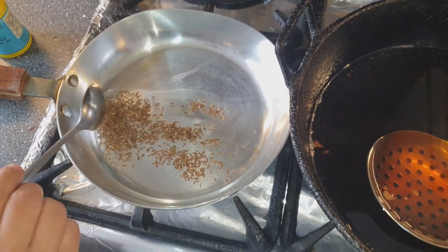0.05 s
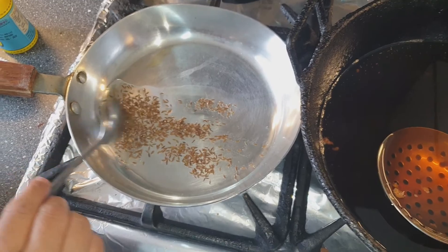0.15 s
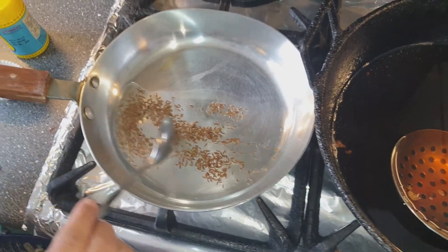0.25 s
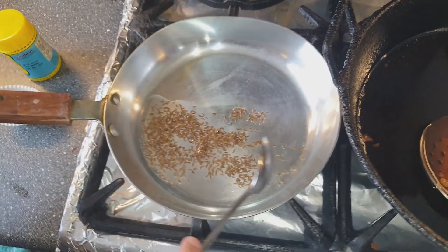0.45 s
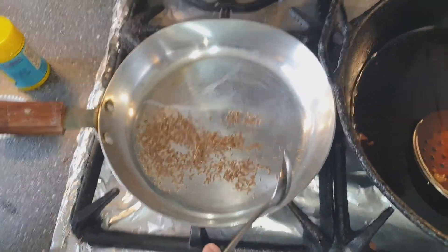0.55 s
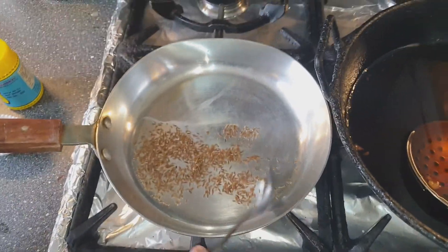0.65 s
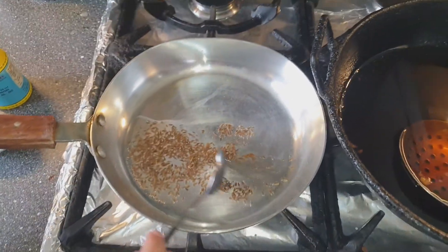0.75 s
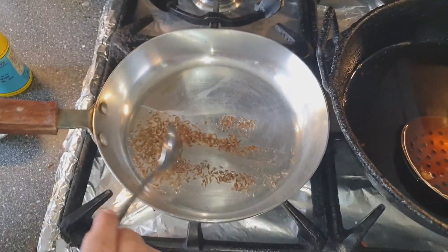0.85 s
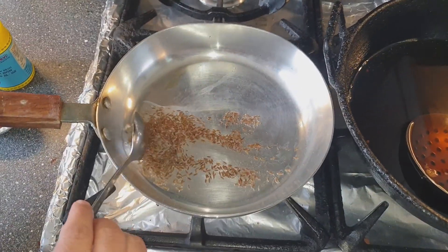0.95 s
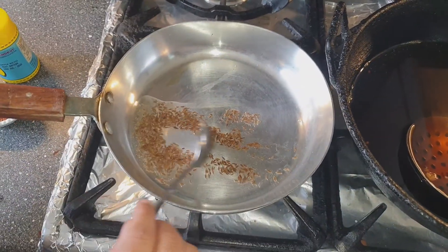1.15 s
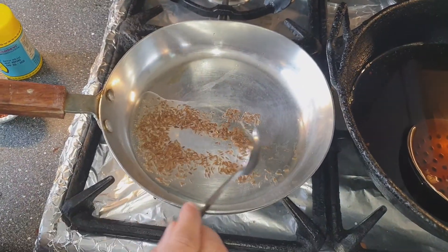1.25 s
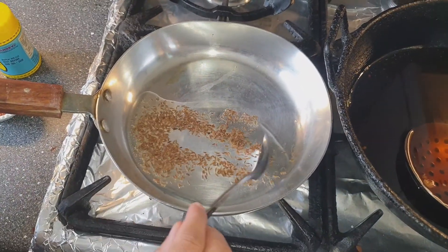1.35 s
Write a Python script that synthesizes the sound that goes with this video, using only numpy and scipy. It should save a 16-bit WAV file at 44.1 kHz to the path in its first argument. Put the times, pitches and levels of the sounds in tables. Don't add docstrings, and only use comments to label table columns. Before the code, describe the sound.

Close stereo pickup in a small kitchen: spoon strikes a thin steel pan, bounces and rings, strikes harder and scrapes, then lands softly on the base; tiny seed ticks and a quiet fan hum lie beneath.

```python
import sys
import numpy as np
from scipy import signal
from scipy.io import wavfile
from scipy.ndimage import uniform_filter1d

SR = 44100
rng = np.random.default_rng(int(sys.argv[2]) if len(sys.argv) > 2 else 0)


def amplitude_ratio(level_db):
    exponent = np.asarray(level_db, float) / 20
    return 10 ** exponent


def put_to_file(sound):
    columns = np.atleast_2d(sound).T
    safe = np.clip(columns, -1, 1)
    whole_steps = np.round(safe * 32767)
    wavfile.write(sys.argv[1], SR, whole_steps.astype(np.int16))


N = 61739

# f/Hz, density/dB
HISS = [(47, 0), (80, -14.5), (160, -16), (348, -15.5), (693, -30.5), (758, -28.5), (7020, -37),
        (15000, -32), (16400, -95)]
HISS_DB = -53.5
# f/Hz, width/Hz, gain/dB
HISS_DIP = (3130, 620, -4.5)
HISS_BUMPS = [(6800, 1010, 8.6), (4760, 820, 5.1), (1790, 144, 7.6)]
# f/Hz, likeness/1
HISS_LIKENESS = [(60, 0.62), (240, 1), (950, -0.17), (3770, -0.37), (15000, 0.65)]
# f/Hz, balance/dB
HISS_PAN = [(60, 1), (240, -3), (950, 2.0), (3770, 1.0), (15000, 4)]

# t/s, f/Hz, level/dB
FAN_TONE = [(0, 48.66, -40.5), (.5, 48.75, -41), (.75, 48.28, -40.5), (1.049, 48.6, -41), (1.4, 49, -40)]
FAN_PAN_DB, FAN_LEAD_RAD = -3, 0.49
# f/Hz, level/dB, width/Hz
FAN_DRONES = [(69, -58, 6), (108, -60, 16), (343, -64, 19), (635, -67.5, 44)]
# t/s, gain/dB
DRONE_SWELL = [(0, 0), (.6, -2.5), (.9, 1), (1.4, -2)]

# f/Hz, t60/s
ROOM_T60 = [(300, 0.43), (2000, 0.31), (8000, 0.34), (15000, 0.34)]
ROOM_DB = -9.5

# t/s, level/dB, length/s, centre f/Hz, balance/dB
SEED_TICKS = [
    (0.064, -47, 0.0017, 12100, 5),
    (0.339, -51, .003, 11000, -8),
    (0.4764, -42.5, 0.00054, 12700, 12.5),
    (0.479, -53.5, 0.018, 10200, 7),
    (0.499, -45, 0.0042, 8750, 5),
    (0.5655, -47, 0.0045, 9750, 6),
    (0.879, -43, 0.0046, 4160, 1),
]

# t/s, level/dB, f/Hz, t60/s, balance/dB
CATCHES = [(.213, -40, 4200, 0.053, 14), (.221, -29, 2780, 0.23, -1), (.224, -28.5, 2355, .15, -6),
           (.225, -33, 2400, 0.073, -1), (.216, -34, 3110, 0.18, -13), (.244, -42, 1557, 0.18, 24),
           (.288, -54, 2410, 0.076, -5), (.203, -35.5, 677, .1, -4), (.318, -46, 3075, 0.099, 0),
           (.305, -53, 635, 0.27, 10), (.718, -34, 1084, 0.16, 10), (.72, -55, 777, 0.17, -6),
           (.733, -37, 1580, 0.044, -17), (.736, -34.5, 2380, 0.087, 5), (.736, -36.5, 3086, 0.18, -5),
           (.742, -35.5, 1084, 0.17, 0), (.743, -38, 777, 0.32, 6.5), (.744, -36, 1910, 0.054, -18),
           (.751, -35, 2417, 0.093, 3), (.76, -38.5, 1084, 0.14, 7), (.768, -41, 4010, .08, -8),
           (.776, -38.5, 1990, 0.16, 1), (.783, -35.5, 2340, .1, -3), (.786, -38, 876, 0.11, 9),
           (.794, -36, 938, 0.088, -3), (.815, -35.5, 953, 0.091, 2), (.822, -33.5, 815, 0.035, 3),
           (.815, -47.5, 3090, .1, -6), (.818, -52, 2300, 0.072, 0), (.832, -42.5, 2336, .12, 2),
           (.841, -44, 2437, 0.068, 5), (1.048, -38.5, 956, 0.088, 7), (1.046, -32.5, 403.3, 0.14, 1.5),
           (1.048, -43.5, 778, 0.12, 4), (1.039, -33, 2314, 0.074, 5), (1.08, -38, 226, 0.078, 2),
           (1.088, -45, 971, 0.24, 4), (1.09, -53.5, 1995, 0.18, 2), (1.107, -38.5, 230, 0.11, -2),
           (1.158, -61, 1084, 0.33, -5)]
CATCH_CYCLES, CATCH_RISE_S = 1.5, 0.0014

# t/s, level/dB
DRAG_PRESSURE = [
    (0.7, -27.5),
    (.725, -44),
    (.77, -37),
    (0.826, -41),
    (0.849, -48),
    (0.879, -55.5),
    (0.961, -68.5),
]
# f/Hz, width/Hz, level/dB
DRAG_MODES = [(777, 60, -5), (880, 93, -8), (1084, 50, 9), (1906, 100, -6), (2326, 95, 7), (2640, 80, -19),
              (3200, 99, 8), (1630, 200, 9)]
DRAG_SHIFT_S = .785
# f/Hz, density/dB
DRAG_HISS = [(150, -11), (390, -10.5), (560, -24), (900, -10), (2400, -13), (4500, -11), (10000, -20),
             (15500, -25)]
DRAG_HISS_DB, DRAG_FADE_DB_PER_S = 7, 25

# t/s, level/dB, clatter/dB, clatter length factor/1, time until the spoon mutes the ring/s
BLOWS = [
    (-.06, -33.5, -0.5, 0.92, 0.11),
    (0.2019, -19.5, -5.5, 0.9, 0.13),
    (0.6916, -16.5, -9, 1, 0.02),
    (1.0313, -31, -5, 0.96, 0.18),
]
# f/Hz, level/dB, t60/s, balance/dB
EARLIER_MODES = [(1561, 0, .5, -1), (1985, -14, .35, 3), (2794, -11, .55, -6), (1040, -16, .2, 0),
                 (620, -17, .2, 0)]
# f/Hz, level/dB, t60/s, balance/dB
WALL_MODES = [(635, -8, .24, 3), (1084, -5, .31, 10), (1562, -4, .58, -5), (1984, 0, .24, 5),
              (2400, -3, .2, 3), (2780, -7, .28, -5), (1217, -14, .25, -5), (1955, -5, .1, -3),
              (2315, -7, .13, -4), (3075, -15, .29, -1), (3466, -14, .2, 5), (3661, -7, .09, 2),
              (870, -10, .13, -2), (190, -14, .12, 0)]
# f/Hz, level/dB, t60/s, balance/dB
FAR_WALL_MODES = [(1042, -8.5, 0.33, -12), (1553, -1, 0.15, 3), (1947, 2, 0.39, 8.5),
                  (3090, -38, 0.075, 11), (2320, -3.5, 0.061, 8), (3110, -1, 0.087, 1),
                  (393, -6.5, 0.12, 0), (213, -13.5, 0.24, -2), (629, -11, 0.12, 8), (7470, 5, 0.0049, 9.5)]
# f/Hz, level/dB, t60/s, balance/dB
BASE_MODES = [(233.6, -0.5, 0.3, -3), (401.4, -10, 0.33, 1), (637, -16, 0.55, 6), (956, -10, 0.23, 9),
              (1049, -15.5, 0.64, -3), (1203, -6.5, 0.12, 13), (301.7, -2.5, 0.23, 0),
              (1978, -13.5, 0.35, 1), (1738, -6, 0.12, -4), (3486, -6, 0.054, -13.5),
              (4294, -6.5, 0.029, 24), (188.4, -3, 0.29, 3), (344, -7, 0.35, 0)]
# f/Hz, density/dB
CLATTER_COLOURS = [
    [(300, -8), (1500, -11.5), (4000, -18.5), (15500, -39)],
    [(150, -18), (480, -14.5), (750, -4), (2200, -6), (5000, -10), (11500, -19.5), (15500, -28.5)],
    [(150, -12), (600, -9.5), (900, 2), (2200, -9), (5000, -16), (11500, -21.5), (15500, -32)],
    [(150, -5), (330, -0.5), (580, -21), (1000, -5.5), (2500, -15), (6000, -21.5), (15500, -29)],
]
# f/Hz, t60/s
CLATTER_T60 = [(200, 0.15), (1000, 0.35), (3000, 0.36), (8000, 0.14), (15000, 0.44)]
CLATTER_LIKENESS, CLATTER_PAN_DB, RIPPLE_DB = 0.097, 8.5, 7
CRACK_S, CRACK_DB = 0.0083, -4
TREBLE_CRACK_S, TREBLE_CRACK_DB = 0.0096, 2.5
CONTACT_S, CONTACT_CYCLES = .0003, 0.65
HARD_DB = -22
MUTE_S, MUTE_DB, MUTED_DB_PER_S = .025, -19, 96

LAG_S, MODE_SCATTER_RAD, EDGE_HZ = .0001, .2, 15400
SIDE = np.array([[.5], [-.5]])
# from f/Hz, to f/Hz, share emptied/1
LOST_BANDS = [
    (2300, 3900, .09),
    (7500, 15000, .05),
]
LOST_DB, LOUD_DB = -20, 9


def evened(x):
    return x / np.sqrt(np.mean(x ** 2) + 1e-20)


def read(points, hz):
    f, value = np.transpose(points)
    return np.interp(np.log(hz + 1), np.log(f + 1), value)


def add(mix, s, sound):
    at = round(s * SR)
    sound = sound[:, max(-at, 0):]
    part = mix[:, max(at, 0):][:, :sound.shape[1]]
    part += sound[:, :part.shape[1]]


def ports(length, same):
    a, b = rng.standard_normal((2, length))
    right = same * np.roll(a, round(LAG_S * SR)) + np.sqrt(1 - same ** 2) * b
    return np.array([a, right])


def shaped(x, db_at, size=256):
    hz, t, z = signal.stft(x, SR, nperseg=size, noverlap=size * 3 // 4)
    z = z * amplitude_ratio(db_at(hz[:, None], t))
    return signal.istft(z, SR, nperseg=size, noverlap=size * 3 // 4)[1][:, :x.shape[1]]


def resonate(x, hz, width):
    return signal.lfilter(*signal.iirpeak(hz, hz / max(width, 1), SR), x)


def kitchen():
    frames, hz = N // 256 + 5, np.fft.rfftfreq(1024, 1 / SR)
    a, b, c, d, patches = rng.standard_normal((frames, 513, 5)).T
    patches = evened(uniform_filter1d(uniform_filter1d(patches, 12, 0), 14, 1))
    same = np.clip(read(HISS_LIKENESS, hz), -1, 1)[:, None]
    left = a + 1j * b
    right = same * left + np.sqrt(1 - same ** 2) * (c + 1j * d)
    right = right * np.exp(-2j * np.pi * hz * LAG_S)[:, None]
    colour = read(HISS, hz) - 30 * (hz < 60)
    for f, width, gain in [*HISS_BUMPS, HISS_DIP]:
        colour = colour + gain * np.exp(-((hz - f) / width) ** 2)
    balance = SIDE[:, :, None] * read(HISS_PAN, hz)[:, None]
    z = np.array([left, right]) * amplitude_ratio(colour[:, None] + 2.2 * patches + balance)
    return amplitude_ratio(HISS_DB) * evened(signal.istft(z, nperseg=1024, noverlap=768)[1][:, :N])


def fan():
    s, hz, db = np.transpose(FAN_TONE)
    t = np.arange(N) / SR
    turn = 2 * np.pi * np.cumsum(np.interp(t, s, hz)) / SR + 4.55
    level = amplitude_ratio(np.interp(t, s, db) + SIDE * FAN_PAN_DB)
    tone = np.sqrt(2) * level * np.sin(turn + SIDE * FAN_LEAD_RAD)
    drones = np.zeros((2, N))
    for f, drone_db, width in FAN_DRONES:
        fuzz = resonate(resonate(ports(N, 0.94), f, width), f, width)
        drones += amplitude_ratio(drone_db) * evened(fuzz)
    return tone + amplitude_ratio(np.interp(t, *np.transpose(DRONE_SWELL))) * drones


def room(x):
    taps = rng.choice([-1., 1.], (2, SR // 2)) * (rng.random((2, SR // 2)) < .05)
    taps[:, :200] = 0
    tail = shaped(taps, lambda f, s: -60 * s / read(ROOM_T60, f) - 8 * (f < 500))
    return signal.fftconvolve(x, tail / np.linalg.norm(tail[0]), axes=1)[:, :N]


def tick(start, db, length, hz, pan_db):
    t = np.arange(SR // 20) / SR
    puff = evened(resonate(ports(len(t), 0.14), hz, min(hz * 0.84, SR / 3)))
    return start, puff * np.exp(-t / length) * amplitude_ratio(db + SIDE * pan_db)


def catch(start, db, hz, t60, pan_db):
    t = np.arange(SR // 5) / SR
    swell = np.sin(np.pi / 2 * np.minimum(t / (CATCH_RISE_S + CATCH_CYCLES / hz), 1)) ** 2
    level = amplitude_ratio(db + SIDE * pan_db - 60 * t / t60)
    tone = np.sin(2 * np.pi * (hz * (t + SIDE * LAG_S) + rng.random()))
    return start, np.sqrt(2) * swell * level * tone


def scrape():
    s, db = np.transpose(DRAG_PRESSURE)
    t = np.arange(N) / SR
    roughness = evened(uniform_filter1d(rng.standard_normal(N), size=60))
    rub = ports(N, CLATTER_LIKENESS) * amplitude_ratio(1.8 * roughness)
    rub *= amplitude_ratio(np.interp(t, s, db, left=-120, right=-120))
    scale = np.sqrt(np.mean(rub ** 2))
    late = np.clip((t - DRAG_SHIFT_S) / .015 + .5, .1, .9)
    shares = [1 - late, late, 1 - late] + [1] * len(DRAG_MODES)
    tones = np.zeros((2, N))
    for share, (f, width, mode_db) in zip(shares, DRAG_MODES):
        tones += amplitude_ratio(mode_db) * share * resonate(rub, f, width) / np.sqrt(width)

    def hiss_db(f, s):
        fade = DRAG_FADE_DB_PER_S * np.clip(s - DRAG_PRESSURE[0][0], 0, .3)
        return read(DRAG_HISS, f) - fade * (f > 3500)

    hiss = shaped(rub, hiss_db)
    return scale * evened(evened(tones) + amplitude_ratio(DRAG_HISS_DB) * evened(hiss)) * amplitude_ratio(3 * SIDE)


def struck_modes(t, modes, mute):
    hz, mode_db, t60, pan = np.transpose(modes)[:, :, None]
    phase, lead = rng.standard_normal((len(modes), 2)).T[:, :, None]
    onset = np.minimum(hz * t / (CONTACT_CYCLES * (1 + (400 / hz) ** 2)), 1)
    ring = []
    for side in (.5, -.5):
        level = amplitude_ratio(mode_db + side * pan - 60 * t / t60)
        cycles = hz * (t + side * LAG_S) + 0.19 * phase
        wave = np.sin(2 * np.pi * cycles + side * MODE_SCATTER_RAD * lead)
        ring.append((level * onset * wave).sum(0))
    muting = MUTE_DB * np.clip((t - mute) / MUTE_S, 0, 1) - MUTED_DB_PER_S * np.maximum(t - mute, 0)
    return np.array(ring) / np.linalg.norm(amplitude_ratio(mode_db)) * amplitude_ratio(muting)


def clatter(t, colour, stretch):
    ripple = RIPPLE_DB * np.clip(rng.standard_normal((513, 1)), -3, 1.6)
    noise = ports(len(t), CLATTER_LIKENESS)
    noise = shaped(noise, lambda f, s: ripple * np.minimum(f / 4000, 1) ** 2, size=1024)

    def decay_db(f, s):
        treble_crack = TREBLE_CRACK_DB * f / EDGE_HZ * np.exp(-s / TREBLE_CRACK_S)
        return read(colour, f) - 60 * s / (stretch * read(CLATTER_T60, f)) + treble_crack

    noise = shaped(noise, decay_db)
    noise = noise / np.sqrt(np.mean(noise[:, :SR // 100] ** 2))
    return noise * (1 + amplitude_ratio(CRACK_DB) * np.exp(-t / CRACK_S))


def blow(row, modes, colour):
    start, db, clatter_db, stretch, mute = row
    t = np.arange(SR // 2) / SR
    balance = SIDE * CLATTER_PAN_DB * np.exp(-t / 0.009)
    both = np.sqrt(2) * struck_modes(t, modes, mute)
    both = both + clatter(t, colour, stretch) * amplitude_ratio(clatter_db + balance)
    onset = np.minimum(t / CONTACT_S * amplitude_ratio(min(2 * (db - HARD_DB), 0)), 1)
    return start, amplitude_ratio(db) * both * onset


def lose_weak_bands(x):
    hz, t, z = signal.stft(x, SR, nperseg=1024, noverlap=768)
    power = uniform_filter1d((abs(z) ** 2).sum(0), size=5, axis=0)
    level = 10 * np.log10(uniform_filter1d(power, size=5, axis=1) + 1e-18)
    under = level - uniform_filter1d(level, size=60, axis=0)
    upper = level[hz > LOST_BANDS[0][0]]
    moment = upper.mean(0) - np.median(upper)
    empty = np.zeros(level.shape)
    for (lo, hi, share), when in zip(LOST_BANDS, (moment < LOUD_DB / 4, moment > LOUD_DB)):
        cells = ((hz > lo) & (hz < hi))[:, None] & when
        empty += cells & (under < np.quantile(under[cells], share))
    return signal.istft(z * amplitude_ratio(LOST_DB * empty), SR, nperseg=1024, noverlap=768)[1][:, :N]


def scene():
    pan = scrape()
    strikes = (EARLIER_MODES, WALL_MODES, FAR_WALL_MODES, BASE_MODES)
    for row, modes, colour in zip(BLOWS, strikes, CLATTER_COLOURS):
        add(pan, *blow(row, modes, colour))
    for row in SEED_TICKS:
        add(pan, *tick(*row))
    for row in CATCHES:
        add(pan, *catch(*row))
    return pan + amplitude_ratio(ROOM_DB) * room(pan) + fan() + kitchen()


def low_pass(x):
    return signal.sosfilt(signal.butter(12, 16510, fs=SR, output="sos"), x)


def record(dry):
    edge = signal.firwin(255, EDGE_HZ, window=("kaiser", 6), fs=SR)
    mix = signal.oaconvolve(lose_weak_bands(dry), edge[None], "same")
    return low_pass(mix)


dry = scene()
out = record(dry)
put_to_file(out)
```